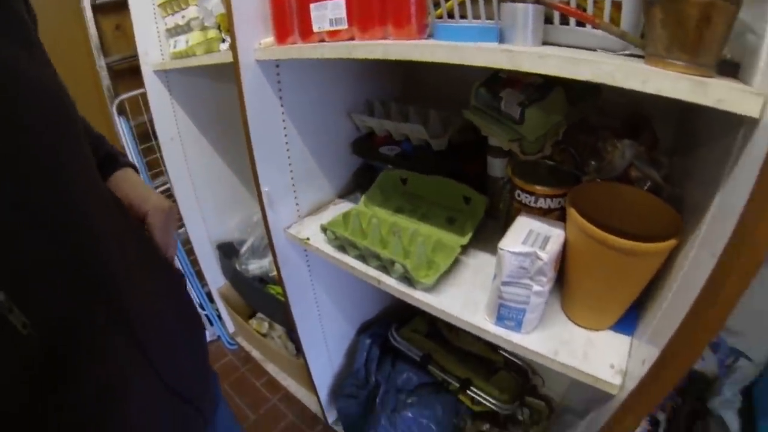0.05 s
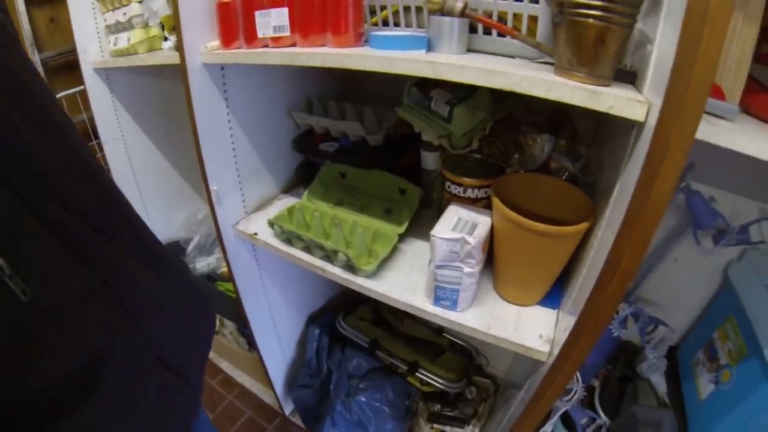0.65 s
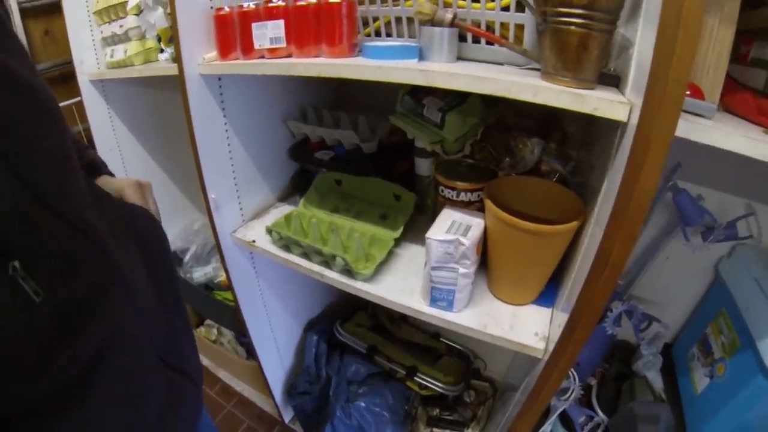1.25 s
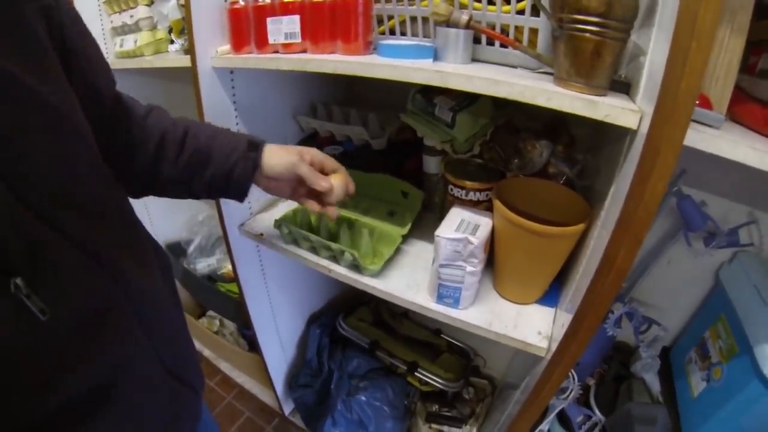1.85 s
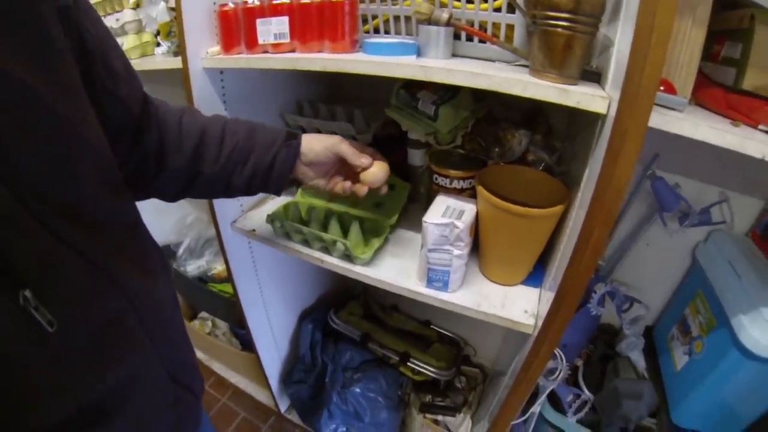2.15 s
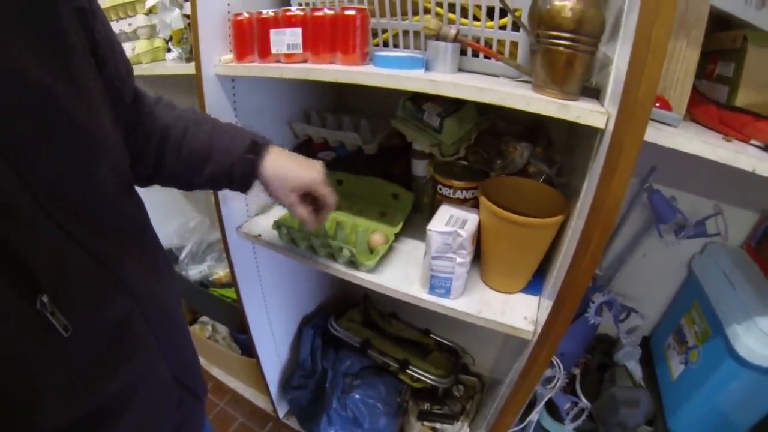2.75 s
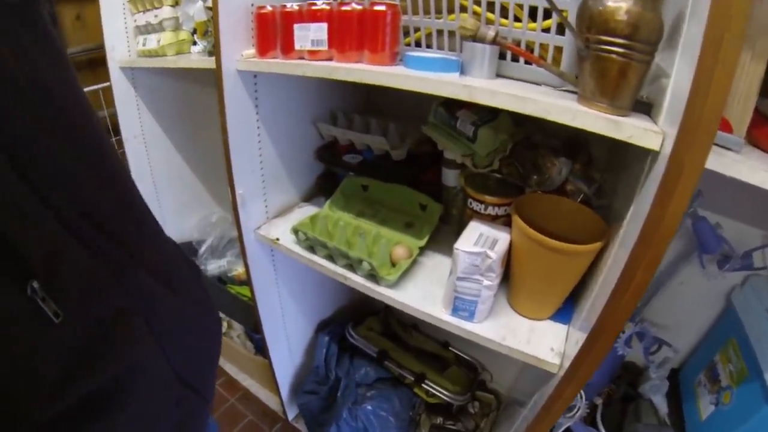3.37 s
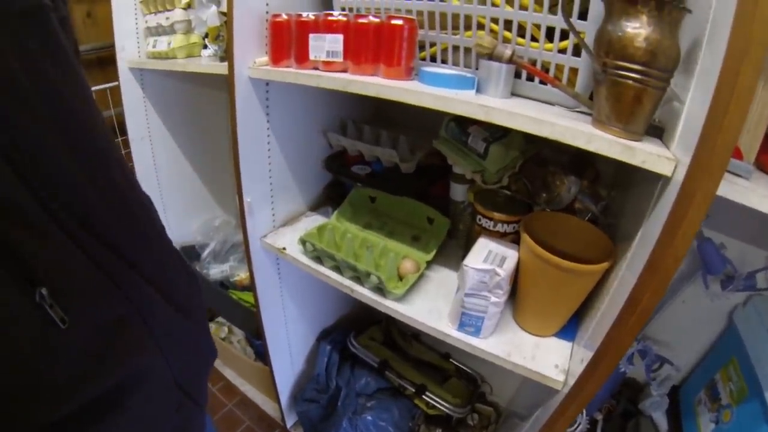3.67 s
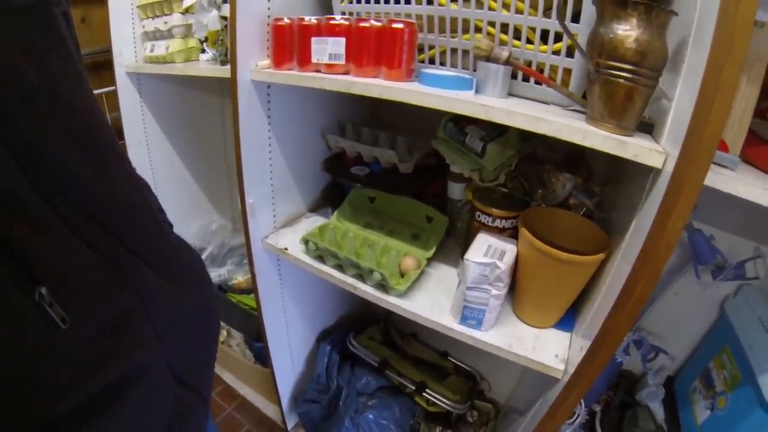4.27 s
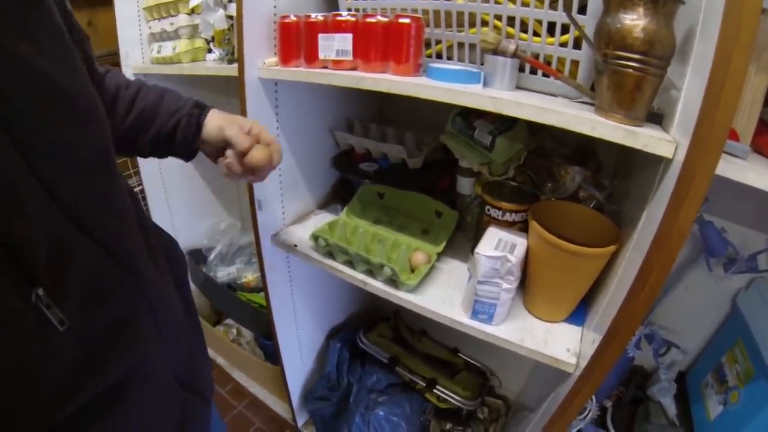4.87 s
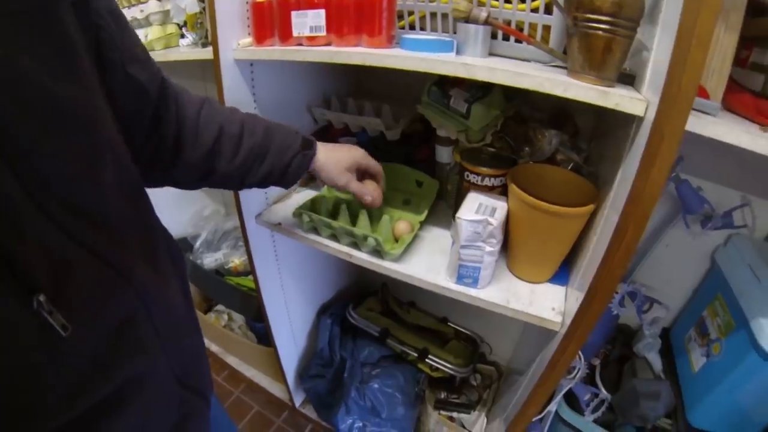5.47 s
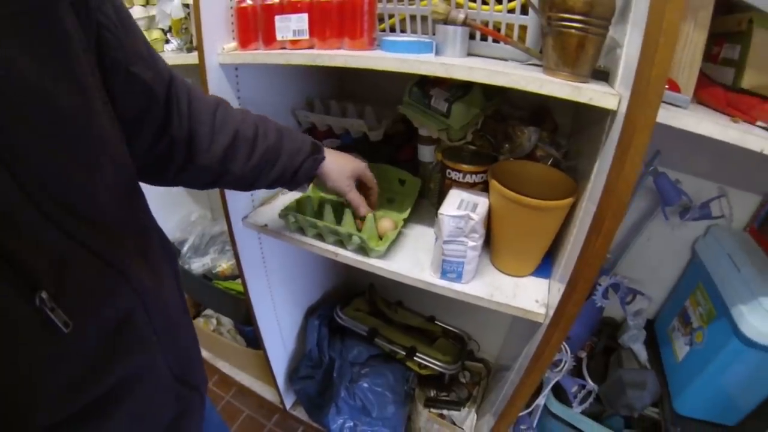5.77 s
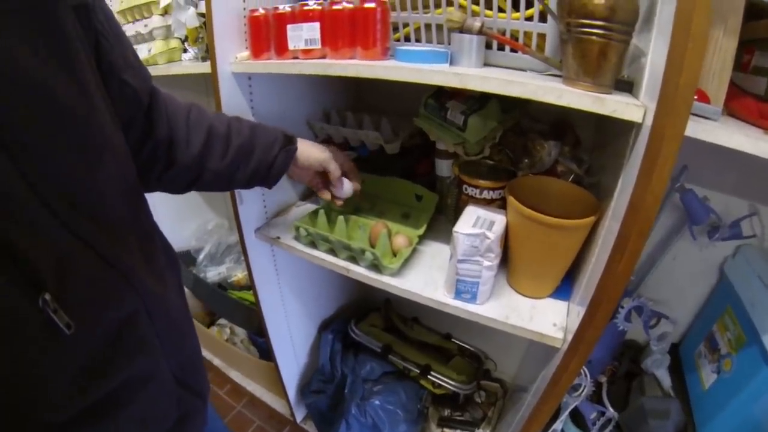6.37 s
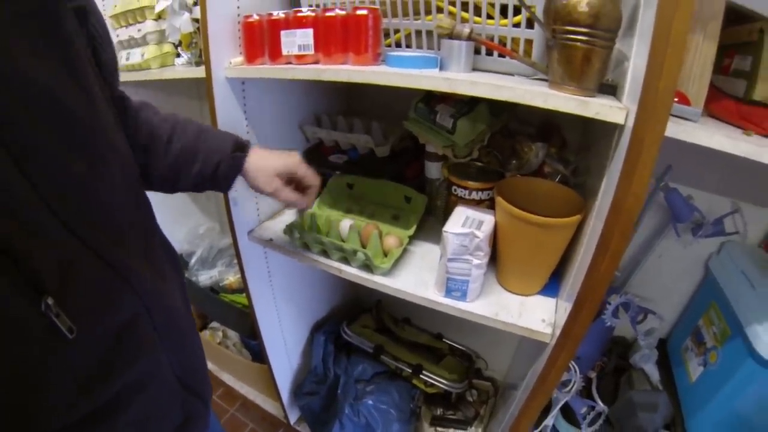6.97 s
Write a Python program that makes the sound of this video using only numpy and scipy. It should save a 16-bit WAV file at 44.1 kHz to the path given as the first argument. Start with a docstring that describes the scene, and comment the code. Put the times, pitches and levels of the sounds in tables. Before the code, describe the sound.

Three eggs are set into a cardboard carton on a shelf, heard from close by in a small storeroom. Soft jacket swishes and ticks come first, then a short bird phrase from outside, during which the first egg drops in with a dull, hollow knock. Far chirps dot a lull before the second and third eggs scrape and knock into place, over faint room rumble, hiss and electrical whine.

```python
"""Three eggs into a carton

Eggs are set one by one into a pulp carton on a shelf in a small storeroom. Each shell scrapes into
its cup and lands with a hollow knock that makes the shelf boom. A jacket rustles and ticks, a small
bird sings one phrase outside, another chirps far off, and electronics hiss and whine faintly."""
import sys
import numpy as np
from scipy import signal
from scipy.fft import rfft, irfft
from scipy.io import wavfile
from scipy.ndimage import uniform_filter1d

SR = 44100
rng = np.random.default_rng(int(sys.argv[2]) if len(sys.argv) > 2 else 0)


def generate_wav(signal):
    """Clip the signal to [-1, 1] and save it as 16-bit WAV at the path in sys.argv[1]."""
    frames = np.transpose(np.atleast_2d(signal))
    scaled = np.clip(frames, -1, 1) * 32767
    pcm = np.round(scaled).astype(np.int16)
    wavfile.write(sys.argv[1], SR, pcm)


N = 318843
TIME_S = np.arange(N) / SR
EVENT_N = SR // 2
AGE_S = np.arange(EVENT_N) / SR   # time since an event's onset


def from_db(db):
    """Decibels to gain."""
    return 10 ** (np.asarray(db) / 20)


def unit_rms(x):
    """Scale to unit rms."""
    return x / np.sqrt(np.mean(x ** 2) + 1e-20)


def rise(tau_s):
    """Exponential attack."""
    return 1 - np.exp(-AGE_S / tau_s)


def decay(t60_s):
    """Exponential decay."""
    return np.exp(-np.log(1000) * AGE_S / t60_s)


def add(out, time_s, sound):
    """Mix a sound in at time_s."""
    at = max(0, round(time_s * SR))
    out[at:at + len(sound)] += sound[:N - at]


def lowpass(x, cutoff_hz):
    """Second-order low-pass."""
    return signal.sosfilt(signal.butter(2, cutoff_hz, fs=SR, output="sos"), x)


def colour_gain(colour, size):
    """Gain per FFT bin from (frequency [Hz], level [dB]) points."""
    hz, db = np.transpose(colour)
    bins_hz = np.maximum(np.fft.rfftfreq(size, 1 / SR), 1)
    return from_db(np.interp(np.log(bins_hz), np.log(hz), db))


def noise(colour, size):
    """Unit-rms coloured noise."""
    return unit_rms(irfft(rfft(rng.standard_normal(size)) * colour_gain(colour, size), size))


def band_noise(hz, width_hz, size=EVENT_N):
    """Unit-rms noise in one steep-sided resonance."""
    offset = (np.fft.rfftfreq(size, 1 / SR) - hz) / width_hz
    return unit_rms(irfft(rfft(rng.standard_normal(size)) / (1 + offset ** 2), size))


def pitched_noise(colour, hz, width_ratio, band_db):
    """Unit-rms coloured noise with one resonance standing out."""
    return unit_rms(noise(colour, EVENT_N) + from_db(band_db) * band_noise(hz, width_ratio * hz))


def grain(depth_db, rate_hz, size):
    """Randomly flickering gain."""
    steps = np.arange(size)
    return from_db(depth_db * np.interp(steps / SR * rate_hz, steps, rng.standard_normal(size)))


def recolour(burst, colour, smooth_bins, length_s=0.35):
    """Flatten a burst's spectrum, then colour and truncate it at equal energy."""
    spectrum = rfft(burst)
    magnitude = np.sqrt(uniform_filter1d(np.abs(spectrum) ** 2, smooth_bins) + 1e-18)
    out = irfft(spectrum / magnitude * colour_gain(colour, EVENT_N), EVENT_N) * (AGE_S < length_s)
    return out * np.linalg.norm(burst) / np.linalg.norm(out)


# Room rumble and microphone hiss: (frequency [Hz], relative density [dB])
FLOOR_COLOUR = [(20, -1), (50, -6), (85, -8.5), (200, -13), (450, -17.5), (1000, -25.5), (2500, -25.5),
                (4500, -35.5), (7200, -30.5), (9300, -45.5), (10150, -40), (11200, -41.5), (12400, -43),
                (15300, -44.5)]
# Room and electronics drones: (frequency [Hz], width [Hz], level [dB])
DRONE_BANDS = [(54.6, 8.1, -59.5), (5090, 114, -74.5), (6600, 14, -80.5), (10200, 280, -83),
               (13124, 9.1, -100)]


def background(floor_db=-58, pip_db=-66, pip_hz=5572, pip_s=0.022, period_s=0.25, offset_s=0.2):
    """Rumble, hiss, steady drones and a faint pulsing electrical whine."""
    drones = sum(from_db(db) * band_noise(hz, width_hz, N) for hz, width_hz, db in DRONE_BANDS)
    pip_gate = np.sin(np.pi * np.minimum((TIME_S - offset_s) % period_s / pip_s, 1))
    pips = pip_gate * np.sin(2 * np.pi * pip_hz * TIME_S)
    return from_db(floor_db) * noise(FLOOR_COLOUR, N) + drones + from_db(pip_db) * pips


# Room echo spectrum: (frequency [Hz], relative level [dB])
ECHO_COLOUR = [(40, -25), (170, -1.5), (300, 1), (700, -1.5), (2000, 0.5), (8000, 0)]


def storeroom(dry, wet_db, treble_t60_s, bass_t60_s=0.3, crossover_hz=1300, predelay_s=0.004):
    """Direct sound plus a short two-band room echo with little deep bass."""
    echoes = rng.standard_normal(EVENT_N) * (AGE_S > predelay_s)
    bass = lowpass(lowpass(echoes, crossover_hz)[::-1], crossover_hz)[::-1]   # zero phase
    tail = bass * decay(bass_t60_s) + (echoes - bass) * decay(treble_t60_s)
    tail = recolour(tail, ECHO_COLOUR, smooth_bins=24)
    return dry + from_db(wet_db) * signal.fftconvolve(dry, tail / np.linalg.norm(tail))[:N]


# Distant chirps: (time [s], pitch [Hz], level [dB])
FAR_BIRD_CHIRPS = [(3.86, 4250, -64), (3.91, 3450, -71), (4.80, 4550, -64), (5.22, 4700, -67),
                   (5.319, 3350, -64.5), (6.035, 6150, -61), (6.5, 6200, -64)]


def far_bird(width_hz=270, rise_s=0.016, t60_s=0.31, fall_per_s=1.4):
    """Distance smears each chirp into a soft, sinking band."""
    out = np.zeros(N)
    for time_s, hz, db in FAR_BIRD_CHIRPS:
        pitch_hz = hz * np.exp(-fall_per_s * AGE_S)
        glide = np.sqrt(2) * np.sin(2 * np.pi * np.cumsum(pitch_hz) / SR)
        add(out, time_s, from_db(db) * glide * band_noise(0, width_hz) * rise(rise_s) * decay(t60_s))
    return out


# Song phrase: (time [s], length [s], start pitch [Hz], end pitch [Hz], end level re gain_db [dB],
# swell [dB], pitch waver [ratio])
SONG_NOTES = [(1.651, 0.029, 4164, 4126, -57.5, 2, 0.0045), (1.822, 0.051, 4090, 4316, -51, 6, 0.0093),
              (1.886, 0.039, 4330, 4230, -58, 0, .005), (1.862, 0.054, 3690, 3724, -55, 8, 0.0055),
              (1.95, 0.064, 3410, 3260, -67.5, 6, 0.03), (2.298, 0.1, 8300, 7370, -48, 19, 0.012),
              (2.468, .114, 7930, 5670, -51.5, 2, .016), (2.646, 0.056, 6960, 5270, -53.5, -4.5, 0.012),
              (2.786, 0.046, 6660, 4030, -63.5, -12, 0.071), (2.811, 0.041, 8000, 6970, -54, 8, 0.052)]


def near_bird(gain_db=-1.5, glide_power=1.25, waver_hz=95, edge_s=0.012, flutter_db=2.2, flutter_hz=45):
    """Fluttering whistles: a few near-level notes, then falling ones that end hoarsely."""
    out = np.zeros(N)
    for time_s, length_s, start_hz, end_hz, end_db, swell_db, waver_ratio in SONG_NOTES:
        progress = np.minimum(AGE_S / length_s, 1)
        waver = 1 + waver_ratio * band_noise(waver_hz, width_hz=135)
        pitch_hz = (start_hz + (end_hz - start_hz) * progress ** glide_power) * waver
        whistle = np.sqrt(2) * np.sin(2 * np.pi * np.cumsum(pitch_hz) / SR)
        gate = np.clip(np.minimum(AGE_S, length_s + edge_s - AGE_S) / edge_s, 0, 1)
        level_db = end_db - swell_db * (1 - progress) + flutter_db * band_noise(flutter_hz, flutter_hz)
        add(out, time_s, from_db(gain_db + level_db) * gate * whistle)
    return out


# Sleeve brushing the jacket: (time [s], length [s], level [dB])
SLEEVE_STROKES = [(0.0, 0.62, -60), (0.65, 0.31, -64), (0.957, 0.49, -58), (3.025, 0.42, -60),
                  (4.427, 0.37, -65)]


def sleeve_envelope(rest_db=-68.5, ease_power=0.16):
    """Cloth stirs at rest and swells with each arm move."""
    envelope = np.full(N, from_db(rest_db))
    for time_s, length_s, db in SLEEVE_STROKES:
        progress = np.clip((TIME_S - time_s) / length_s, 0, 1)
        hump = np.abs(np.sin(np.pi * progress)) ** ease_power
        envelope = np.hypot(envelope, from_db(db) * hump)
    return envelope


# Clear fabric and zip snaps: (time [s], level [dB], pitch [Hz])
CLEAR_SNAPS = [(0.0665, -58, 4440), (.121, -59, 8500), (0.169, -50, 7970), (0.3254, -56, 6210),
               (0.3777, -45, 8500), (0.4745, -48, 6160), (0.481, -49, 7640), (0.556, -50, 7680),
               (0.573, -46.5, 7400), (0.6485, -50, 7060), (.7282, -55, 5090), (.8185, -61, 6690),
               (0.856, -56, 5500), (0.9105, -52.5, 8000), (0.9802, -50.5, 6270), (1.0033, -50, 8100),
               (1.077, -52.5, 7100), (1.1363, -48, 7300), (1.1822, -46.5, 7040), (1.2486, -49, 6900),
               (1.2974, -47.5, 7500), (1.353, -53, 7750), (1.429, -52, 6700), (1.4594, -51, 6520),
               (1.517, -48, 6250), (1.533, -55, 6360), (1.6227, -51, 6470), (1.755, -59, 7800),
               (1.7915, -46, 7200), (2.256, -57.5, 6540), (4.766, -52, 7900), (4.778, -58, 8300),
               (5.882, -46.5, 6340), (6.0284, -50.5, 6300)]
# Snap spectrum: (frequency [Hz], relative density [dB])
SNAP_COLOUR = [(1000, -13), (3000, -5), (5000, -4), (6300, 1.5), (7800, 3.5), (10000, -5.5), (12000, -23),
               (15000, -45)]


def snaps(rubbing, crack_t60_s=0.0087, rustle_db=-12, rustle_t60_s=0.11, small_per_s=26, small_db=-1.5):
    """Folds and zip crack, then rustle; small random snaps scale with the rubbing."""
    out = np.zeros(N)
    shape = decay(crack_t60_s) + from_db(rustle_db) * decay(rustle_t60_s)
    for time_s, db, hz in CLEAR_SNAPS:
        snap = pitched_noise(SNAP_COLOUR, hz, width_ratio=0.093, band_db=0.5) * shape
        add(out, time_s, from_db(db) * snap)
    triggers = (rng.random(N) < small_per_s / SR) * rubbing * from_db(small_db)
    return out + noise(SNAP_COLOUR, N) * signal.fftconvolve(triggers, shape)[:N]


# Rubbing cloth spectrum: (frequency [Hz], relative density [dB])
SWISH_COLOUR = [(100, 14.5), (250, 6.5), (550, 7.5), (1200, 1), (3000, -1), (5000, -3.5), (7500, -5),
                (10000, -8.5), (12500, -29), (15000, -32)]
# Soft cloth scuffs and one low thud as the body shifts: (time [s], t60 [s], level [dB], centre [Hz],
# width / centre [ratio])
BODY_SHIFTS = [(0.06, 0.31, -53, 2580, .23), (.066, 0.23, -55.5, 5840, .23), (.2, 0.32, -55.5, 500, 1.2),
               (0.231, 0.33, -58, 6900, .23), (0.319, 0.26, -54.5, 6400, 0.22),
               (0.481, 0.71, -58.5, 7460, .23), (1.803, .15, -60, 6800, .23), (3.176, 0.16, -59, 7650, .23),
               (4.612, 0.33, -46, 49.3, .23)]


def jacket(crinkle_db=4, folds_per_s=300, shift_rise_s=0.007):
    """Rubbing cloth swishes unevenly, with snaps, soft scuffs and one low thud."""
    rubbing = sleeve_envelope()
    crinkle = grain(crinkle_db, folds_per_s, N)
    out = rubbing * unit_rms(noise(SWISH_COLOUR, N) * crinkle) + snaps(rubbing)
    for time_s, t60_s, db, hz, width_ratio in BODY_SHIFTS:
        burst = band_noise(hz, width_ratio * hz) * rise(shift_rise_s) * decay(t60_s)
        add(out, time_s, from_db(db) * burst)
    return out


# Shell or fingers sliding on pulp: (time [s], length [s], level [dB], cutoff [Hz], rasp pitch [Hz],
# rasp re rub [dB])
PULP_SLIDES = [(2.54, 0.035, -53.5, 5970, 2820, -9), (5.652, 0.041, -51.5, 2770, 1620, -2),
               (5.723, 0.034, -46.5, 3200, 1600, -13), (5.758, 0.043, -48.5, 3800, 2300, -13),
               (5.816, 0.017, -46.5, 5000, 2190, -1), (6.03, 0.027, -54.5, 8950, 3800, -9),
               (6.641, 0.024, -58.5, 4020, 1520, -7.5), (6.774, 0.015, -44, 3720, 2900, -4),
               (6.785, 0.029, -45.5, 2710, 826, -2)]
# Dry rub spectrum: (frequency [Hz], relative density [dB])
RUB_COLOUR = [(80, 8), (130, 17.5), (300, -6), (600, 2.5), (1100, 1.5), (1600, -2), (2400, 1), (3200, -1),
              (4500, -10.5), (8000, 3), (12000, -18)]


def scrapes(grain_db=3, slips_per_s=600):
    """Rough pulp catches and releases the shell; the tiny slips set the cup wall rasping."""
    out = np.zeros(N)
    for time_s, length_s, db, cutoff_hz, rasp_hz, rasp_db in PULP_SLIDES:
        slips = grain(grain_db, slips_per_s, EVENT_N)
        rasp = pitched_noise(RUB_COLOUR, rasp_hz, width_ratio=0.15, band_db=rasp_db) * slips
        stroke = np.sqrt(np.abs(np.sin(np.pi * np.minimum(AGE_S / length_s, 1))))
        add(out, time_s, from_db(db) * unit_rms(lowpass(rasp, cutoff_hz)) * stroke)
    return out


def ring(modes, cup, rise_cycles, scatter_db, bend=1):
    """Struck modes with a relative pitch bend; strengths vary by cup and from blow to blow."""
    out = np.zeros(EVENT_N)
    phase_per_hz = 2 * np.pi * np.cumsum(bend * np.ones(EVENT_N)) / SR
    for k, (hz, t60_s, *cup_db) in enumerate(modes):
        polarity = (-1) ** (k // 2)
        strength = polarity * from_db(cup_db[cup] + scatter_db * rng.standard_normal())
        out += strength * rise(rise_cycles / hz) * decay(t60_s) * np.sin(hz * phase_per_hz)
    return out


# Shelf modes: (frequency [Hz], t60 [s], gain from cup 1 [dB], cup 2 [dB], cup 3 [dB])
SHELF_MODES = [(47.2, 0.4, -23, -13, -25), (103.8, 0.17, -5, -1, -3), (111.8, 0.29, -2, 1.5, -3.5),
               (126, .2, -5, -19, -1.5), (136, 0.22, -2.5, -25, -4), (160, 0.17, 1, -11, 0),
               (204.8, 0.45, -5, -21, -18), (232, 0.19, -13, -17, -13.5), (280, 0.046, -13, -18, -8)]


def shelf_boom(cup):
    """The egg's weight drives the shelf; each cup sits at its own spot on every mode."""
    return ring(SHELF_MODES, cup, rise_cycles=0.32, scatter_db=0.5)


# Dense, damped pulp vibration: (frequency [Hz], relative density [dB])
PULP_COLOUR = [(50, -32), (110, 11.5), (200, 3.5), (350, -5), (550, 2.5), (800, -4), (1200, -8.5),
               (2000, -11), (3500, -13.5), (8000, -24)]


def pulp_clop(gain_db=3.5, t60_s=0.056, give_s=0.0004):
    """The pulp gives under the egg with a dry clop."""
    burst = rng.standard_normal(EVENT_N) * decay(t60_s)
    return from_db(gain_db) * recolour(burst, PULP_COLOUR, smooth_bins=30) * rise(give_s)


# Cup and lid modes: (frequency [Hz], t60 [s], gain from cup 1 [dB], cup 2 [dB], cup 3 [dB])
CARTON_MODES = [(344.5, 0.17, -9, -28, -25), (436.6, 0.18, -6.5, -12, -12), (489, 0.033, -18, 5.5, -6),
                (545, 0.069, -0.5, -11, -12), (609, 0.26, -22, -14, -20), (687, 0.094, -17, -28, -12),
                (750, 0.12, -11, -35, -7.5), (790, 0.11, -12, -15, -14), (860, 0.034, -16, -9, 0.5),
                (980, 0.081, -26, -28, -9), (1051, 0.079, -10, -10.5, -9.5), (1190, 0.068, -21, -20, -39),
                (1306, 0.075, -7.5, -34, -40), (1545, 0.029, -32, -15, 2.5), (1670, 0.014, -33, -21, 1),
                (1926, 0.025, -10, -28, -14), (2330, 0.04, -31, -12, -25)]


def carton_walls(cup, sharp_ratio=0.064, relax_s=0.012, wobble_ratio=0.022, rock_hz=25):
    """Dented walls ring sharp, relax, and waver as the egg rocks."""
    bend = 1 + sharp_ratio * np.exp(-AGE_S / relax_s) + wobble_ratio * band_noise(0, rock_hz)
    return ring(CARTON_MODES, cup, rise_cycles=0.7, scatter_db=0.8, bend=bend)


# Eggshell click spectrum: (frequency [Hz], relative density [dB])
SHELL_COLOUR = [(500, 0), (1200, -3), (2200, 14.5), (3200, 3), (4500, 0), (8000, -2.5), (10500, -14),
                (12000, -41), (15000, -44)]


def shell_click(hz, t60_s=0.025):
    """The struck shell gives a brief, pitched click."""
    return pitched_noise(SHELL_COLOUR, hz, width_ratio=0.16, band_db=-3) * decay(t60_s)


# Egg-carton contacts, one group per egg: (time [s], level [dB], carton cutoff [Hz],
# relative boom [dB], relative click [dB], click pitch [Hz])
EGG_CONTACTS = [
    [(2.6315, -30.5, 1700, -16, -4, 3500), (2.6338, -23, 1010, -1, -28, 3000),
     (2.661, -42, 600, 7.5, -12, 2200), (2.690, -45, 1100, -1, -1.5, 2980),
     (2.699, -43.5, 1100, 0, -3, 2300), (2.728, -51.5, 1210, -3, 0, 2800)],
    [(5.7865, -55, 2500, -11, 12.5, 2250), (5.8148, -39.5, 2000, -11, -13, 2300),
     (5.8235, -32.5, 1450, -4, -11, 2200), (5.8275, -43, 1500, -1, -10, 2500),
     (5.841, -48, 900, 20, 6, 2270), (5.883, -35.5, 1150, 2.5, -10, 1600), (5.931, -47, 750, 4, -14, 1600)],
    [(6.7835, -39.5, 1300, 2, -8, 3020), (6.8125, -22, 1370, -4, -15, 3370),
     (6.8195, -37.5, 1400, -4, -4, 1900), (6.8305, -44.5, 900, 12.5, -12, 1900),
     (6.8445, -40.5, 1300, -6, -7, 2900), (6.874, -48, 800, -8, -18, 1900)],
]


def knocks():
    """Each egg lands in several contacts, each exciting carton, shelf and shell."""
    out = np.zeros(N)
    for cup, contacts in enumerate(EGG_CONTACTS):
        for time_s, db, cutoff_hz, boom_db, click_db, click_hz in contacts:
            carton = lowpass(pulp_clop() + carton_walls(cup), cutoff_hz)
            boom = from_db(boom_db) * shelf_boom(cup)
            click = from_db(click_db) * shell_click(click_hz)
            add(out, time_s, from_db(db) * (carton + boom + click))
    return out


def scene():
    """Mono mix: eggs and jacket close, birds more reverberant."""
    eggs = storeroom(knocks() + scrapes(), wet_db=-9, treble_t60_s=0.2)
    cloth = storeroom(jacket(), wet_db=-8, treble_t60_s=0.39)
    birds = storeroom(near_bird(), wet_db=0.5, treble_t60_s=0.35) + far_bird()
    return (eggs + cloth + birds + background())[None]


def record(dry, cutoff_hz=15400):
    """Steep elliptic low-pass."""
    return signal.sosfilt(signal.ellip(10, 0.1, 80, cutoff_hz, fs=SR, output="sos"), dry)


dry = scene()
out = record(dry)
generate_wav(out)
```